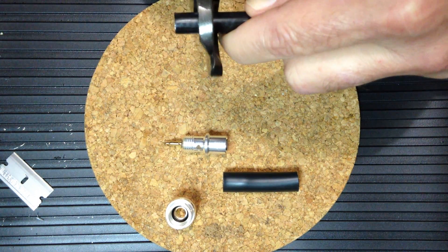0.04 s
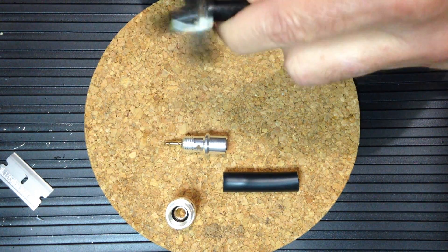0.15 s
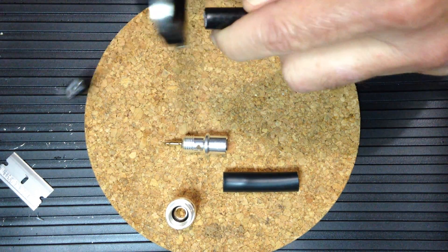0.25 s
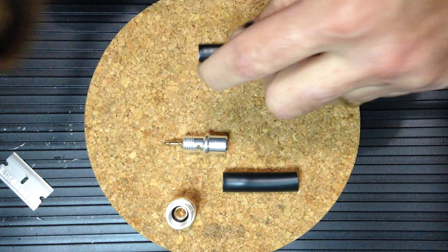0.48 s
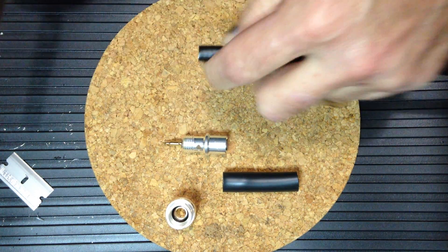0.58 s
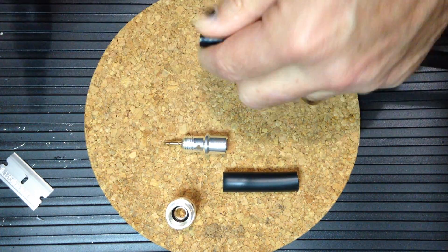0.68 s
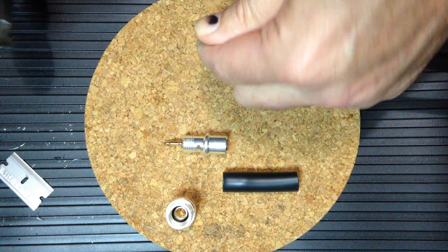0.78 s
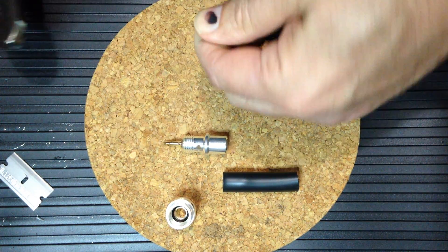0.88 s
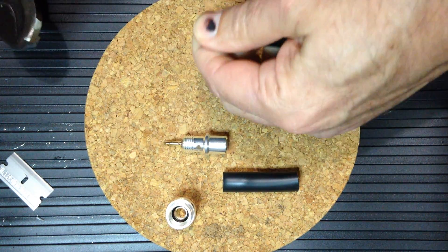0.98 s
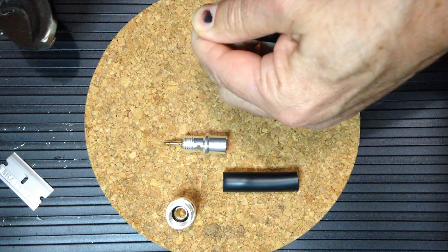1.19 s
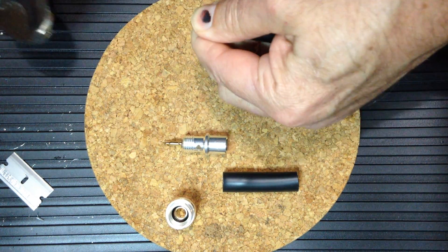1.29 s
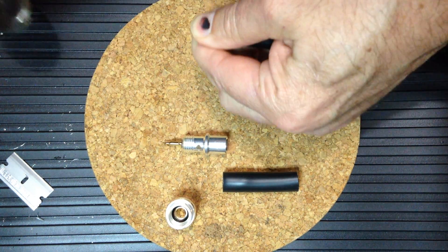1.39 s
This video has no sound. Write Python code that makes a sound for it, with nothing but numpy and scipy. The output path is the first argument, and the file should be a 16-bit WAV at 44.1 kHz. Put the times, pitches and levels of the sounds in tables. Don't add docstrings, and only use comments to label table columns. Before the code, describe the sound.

A single hard metallic snip shears a thick cable, then a small piece thuds and rattles on a mat.

```python
import sys
import numpy as np
from scipy import signal
from scipy.fft import rfft, irfft
from scipy.io import wavfile

SR = 44100
rng = np.random.default_rng(int(sys.argv[2]) if len(sys.argv) > 2 else 0)


def generate_wav(signal):
    frames = np.transpose(np.atleast_2d(signal))
    scaled = np.clip(frames, -1, 1) * 32767
    pcm = np.round(scaled).astype(np.int16)
    wavfile.write(sys.argv[1], SR, pcm)


def how_loud(loudness_db):
    steps = np.asarray(loudness_db, float) / 20
    return 10 ** steps


N = 63945
TIME_S = np.arange(N) / SR


def unit_rms(x):
    return x / np.sqrt(np.mean(x ** 2) + 1e-20)


def at_hz(points, hz):
    f, value = np.transpose(points)
    return np.interp(np.log(hz), np.log(f), value)


def butterworth(x, edges_hz, kind):
    return signal.sosfilt(signal.butter(2, edges_hz, kind, fs=SR, output="sos"), x)


def colour(x, spectrum):
    hz = np.maximum(np.arange(N // 2 + 1) * SR / N, 1)
    return irfft(rfft(x) * unit_rms(how_loud(at_hz(spectrum, hz))), N)


def ring(drive, hz, t60):
    radius = how_loud(-60 / (t60 * SR))
    w = 2 * np.pi * hz / SR
    return signal.lfilter([0, np.sin(w)], [1, -2 * radius * np.cos(w), radius ** 2], drive + 1e-18)


def strike(hits, modes, spread_db):
    s, db = np.transpose(hits)
    luck = rng.standard_normal((len(s), len(modes)))
    out = 0
    for k, (hz, level_db, t60) in enumerate(modes):
        clicks = np.zeros(N)
        clicks[(s * SR).astype(int)] = how_loud(db + level_db + spread_db * luck[:, k])
        out = out + ring(clicks, hz, t60)
    return out


def single_rings(rows):
    return sum(strike([(s, db)], [(hz, 0, t60)], 0) for s, db, hz, t60 in rows)


def grains(per_s, spread_db):
    sizes = how_loud(spread_db * np.minimum(rng.exponential(1, N), 4))
    signs = rng.choice([-1, 1], N)
    return unit_rms(sizes * signs * (rng.random(N) < per_s / SR))


def slam():
    # t/s, peak level/dB, burst decay time/s
    slams = [
        (.2360, -5.5, 0.0024),
        (.2422, -13.5, 0.0011),
        (0.2457, -13.5, 0.0028),
        (0.2494, -22.5, 0.00081),
    ]
    # f/Hz, level/dB, T60/s
    jaws = [(957, -22, .005), (1531, -26, 0.0062), (2280, -12.5, 0.079), (3280, -25.5, .025),
            (3560, -9, .028), (3812, -3, 0.015), (3800, -5.5, .018), (4072, -5.5, 0.02), (4482, -9.5, 0.02),
            (5900, -6, 0.0057), (6417, -2.5, 0.02), (6632, -6, .028), (8060, -1.5, 0.001943),
            (12740, 1, .0012)]

    def decay(start_s, length_s):
        elapsed = TIME_S - start_s
        return (elapsed >= 0) * np.exp(-np.clip(elapsed / length_s, 0, 20))

    noise = rng.standard_normal((2, N))
    burst = noise[0] * sum(how_loud(db) * decay(s, length) for s, db, length in slams)
    ringing = sum(how_loud(db - 21) * ring(burst, hz, t60) for hz, db, t60 in jaws)
    crack = butterworth(noise[1] * decay(slams[0][0], 0.0031), 5100, "high")
    return how_loud(-9) * crack + ringing


def crunch():
    # t/s, level/dB
    snap_level = [
        (.155, -81.5),
        (.166, -61.5),
        (.1940, -72),
        (.1955, -33),
        (.198, -40),
        (.202, -26),
        (.212, -40),
        (.222, -50),
        (.231, -30),
    ]
    # f/Hz, level per Hz/dB
    snap_colour = [(350, -41), (930, -6.5), (1400, -18.5), (2700, -8.5), (4200, -4.5), (5500, -10),
                   (8000, -2), (15500, -11)]
    strands_per_s, spread_db, end_s = 11000, 4, 0.27
    level = how_loud(np.interp(TIME_S, *np.transpose(snap_level), left=-120)) * (TIME_S < end_s)
    return level * colour(grains(strands_per_s, spread_db), snap_colour)


def thud():
    # t/s, peak level/dB
    landings = [
        (.3726, -17.5),
        (.3752, -18),
        (.3785, -20),
        (.383, -26),
        (.389, -34),
        (.448, -35),
        (.4905, -34.5),
    ]
    # f/Hz, level/dB, T60/s
    mat = [(130, -11, 0.071), (190.4, 0, 0.043), (315.8, -9, 0.04), (560, 1.5, 0.017), (820, -9, 0.013),
           (976, 2.5, 0.0096), (1288, -2, 0.041)]
    return how_loud(-7.5) * butterworth(strike(landings, mat, 3), [120, 1900], "band")


def bounce_and_roll():
    # t/s, peak level/dB
    bounces = [(0.49, -39.5), (0.5071, -16), (0.547, -51), (0.5616, -27), (0.5734, -39.5), (0.585, -39),
               (0.5947, -32.5), (0.6004, -33.5), (0.6197, -33.5), (0.6377, -35), (0.6473, -34.5),
               (0.6745, -45), (0.903, -53), (0.9665, -47), (0.982, -41.5), (0.9921, -40.5), (1.0209, -73),
               (1.0938, -44), (1.102, -48), (1.153, -50.5), (1.1908, -62)]
    # f/Hz, level/dB, T60/s
    tube = [(1324, -2, 0.013), (1600, -3.5, 0.012), (2100, -3.5, 0.023)]
    lag_s, spread_db = 0.0004, 2.0
    bouncing = how_loud(-2.5) * strike([(s + lag_s, db) for s, db in bounces], tube, spread_db)
    contacts = grains(500, 3.8) * (TIME_S > 0.51) * (TIME_S < 0.54)
    rolling = how_loud(-60) * unit_rms(sum(how_loud(db) * ring(contacts, hz, t60) for hz, db, t60 in tube))
    return butterworth(bouncing + rolling, [1080, 1750], "band")


def edge_ticks():
    # t/s, peak level/dB, bright edge level/dB
    ticks = [
        (0.3732, -20, -60),
        (0.447, -48, -70),
        (.5076, -23, -36.5),
        (0.5616, -35, -75),
        (.5952, -34, -62),
        (0.603, -60, -46),
        (1.036, -75, -57),
        (1.0665, -72, -70),
    ]
    knocks = strike([(s, db) for s, db, _ in ticks], [(2400, 0, 0.0039), (4450, 1, 0.0018)], 0)
    bright = single_rings([(s, db, 9500, 0.001) for s, _, db in ticks])
    return butterworth(knocks, [1500, 5500], "band") + bright


def clinks():
    # t/s, peak level/dB, f/Hz
    touches = [
        (1.036, -56.5, 6750),
        (1.066, -47.5, 2060),
        (1.066, -54.5, 3830),
        (1.068, -72, 6850),
        (1.079, -48, 2050),
        (1.08, -59, 3900),
        (1.079, -61, 6850),
        (1.092, -45.5, 2100),
        (1.093, -50.5, 2940),
        (1.13, -62, 2100),
    ]
    t60_s = 0.016
    return single_rings([(s, db, hz, t60_s) for s, db, hz in touches])


def room(x):
    # f/Hz, T60/s
    room_t60 = [(150, .15), (500, 0.28), (1500, 0.45), (3700, 0.72), (6500, 0.63), (10000, .46),
                (15000, .3)]
    rise_s = 0.018
    edges_hz = 90 * 2 ** np.arange(0, 8, .5)
    white = rng.standard_normal((2, N))
    tail = 0
    for k, (low, high) in enumerate(zip(edges_hz, edges_hz[1:])):
        t60 = at_hz(room_t60, np.sqrt(low * high))
        tail = tail + butterworth(white[k % 2], [low, high], "band") * how_loud(-60 * TIME_S / t60)
    tail = tail * (1 - np.exp(-(TIME_S / rise_s) ** 2))
    return signal.fftconvolve(x, tail / np.sqrt(np.sum(tail ** 2)))[:N]


def bench_jolts():
    # t/s, peak level/dB, f/Hz, T60/s
    jolts = [(.117, -49, 432, 0.02), (.2, -44.5, 170, 0.062), (.219, -23.5, 40, 0.13),
             (.2365, -19.5, 75, 0.03), (.237, -19, 800, 0.0039), (.356, -40, 293, 0.072),
             (.357, -35.5, 1190, 0.029), (.395, -34, 352, 0.038), (.42, -45.5, 166, 0.16),
             (.445, -49.5, 432.3, 0.05), (1.128, -46, 138, 0.053)]
    return single_rings(jolts)


def rustle():
    # t/s, level/dB
    motion = [(.08, -108.5), (.12, -66), (.15, -88), (.345, -88), (.40, -48), (.5, -61), (.62, -58),
              (.8, -82), (.9, -70), (.98, -65.5), (1.04, -68.5), (1.09, -62), (1.2, -88)]
    # f/Hz, level per Hz/dB
    cloth_colour = [(150, -20.5), (350, 1.5), (700, -3.5), (1400, -1), (2200, -4), (5000, -15),
                    (15500, -21.5)]
    level = how_loud(np.interp(TIME_S, *np.transpose(motion), left=-120, right=-120))
    return level * colour(grains(2000, 1.2), cloth_colour)


def air():
    # f/Hz, level per Hz/dB
    air_colour = [(18, -62), (40, -23), (58, -5.5), (123, -4), (284, -13), (900, -28.5), (4000, -39.5),
                  (15500, -42)]
    # f/Hz, bandwidth/Hz, rms level/dB
    motor = [(63.5, 15, -74), (128.5, 4.3, -67)]
    drone = 0
    for hz, width, db in motor:
        resonance = ring(rng.standard_normal(2 * N), hz, 6.6 / width)
        drone = drone + how_loud(db) * unit_rms(resonance[N:])
    return how_loud(-59) * colour(rng.standard_normal(N), air_colour) + drone


def scene():
    tool = slam() + crunch()
    piece = thud() + bounce_and_roll() + edge_ticks() + clinks()
    wet = room(how_loud(-8.5) * tool + how_loud(-12) * piece)
    return (tool + piece + wet + bench_jolts() + rustle() + air())[None]


def top_cut(x):
    return signal.sosfilt(signal.butter(12, 16470, fs=SR, output="sos"), x)


def record(dry):
    upper_edge = signal.cheby2(12, 45, 15800, fs=SR, output="sos")
    mix = butterworth(signal.sosfilt(upper_edge, dry), 40, "high")
    return top_cut(mix)


dry = scene()
out = record(dry)
generate_wav(out)
```